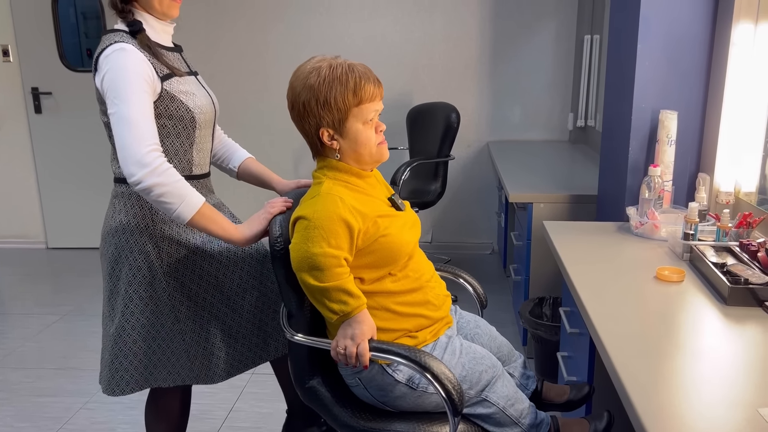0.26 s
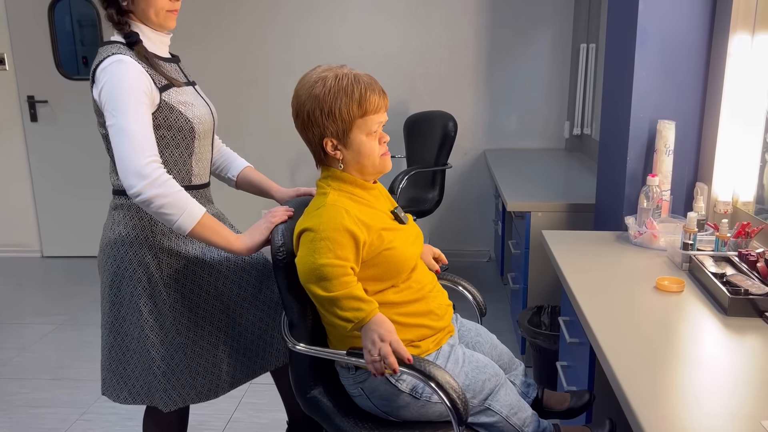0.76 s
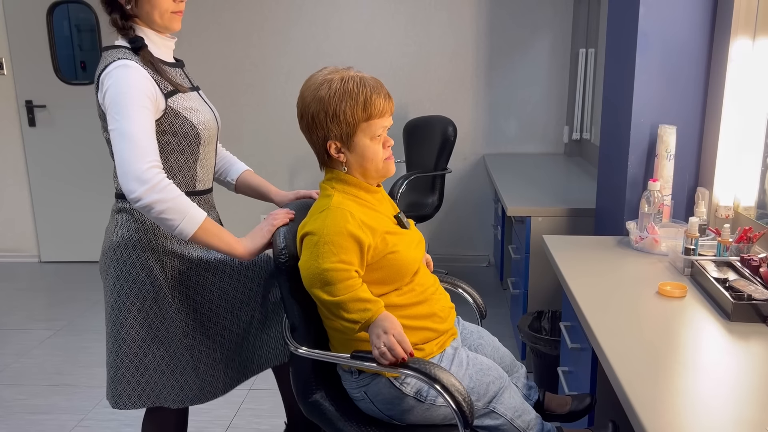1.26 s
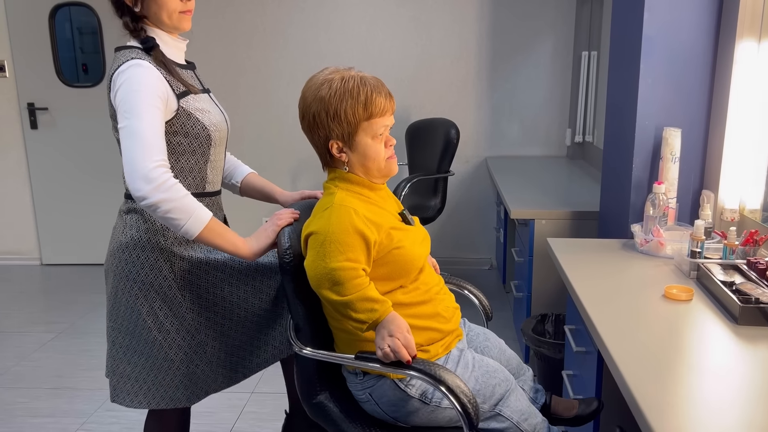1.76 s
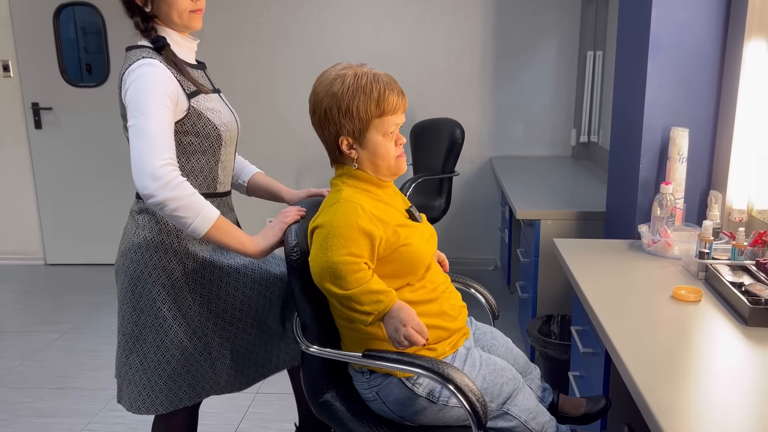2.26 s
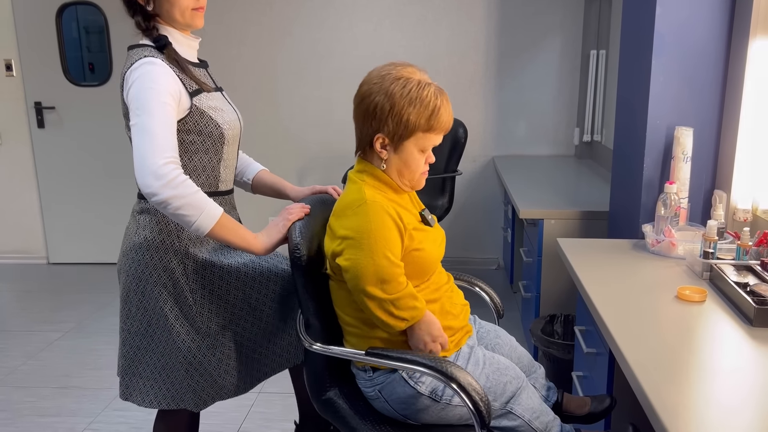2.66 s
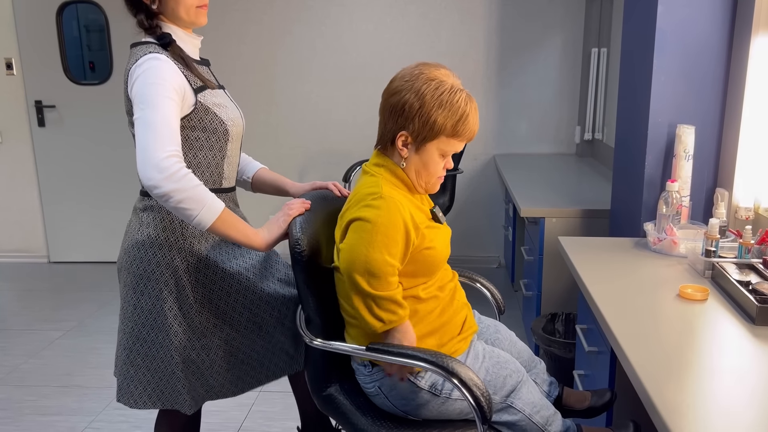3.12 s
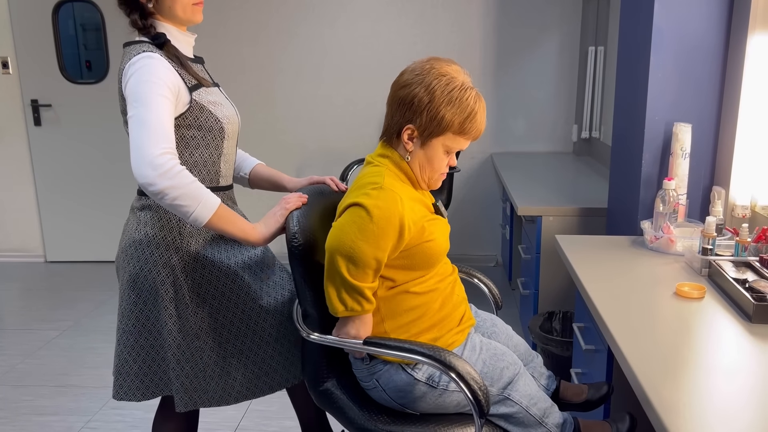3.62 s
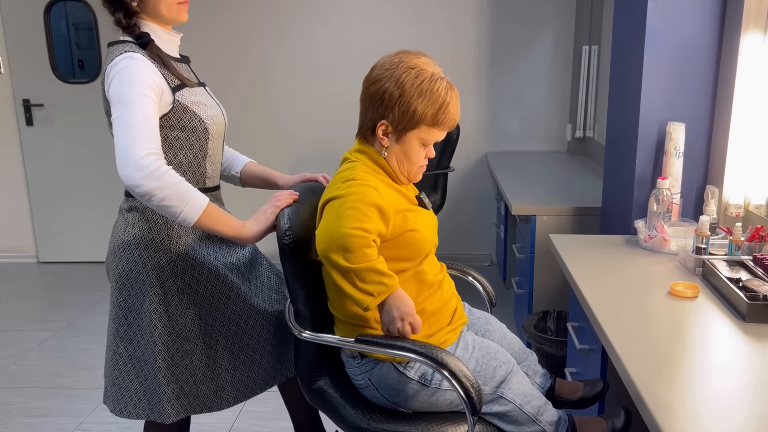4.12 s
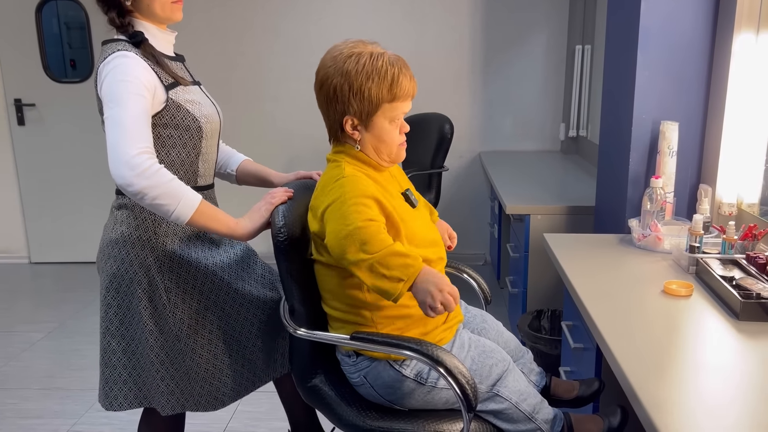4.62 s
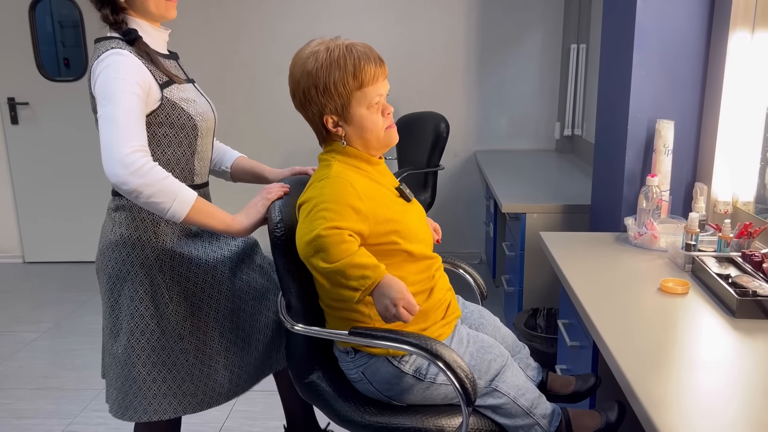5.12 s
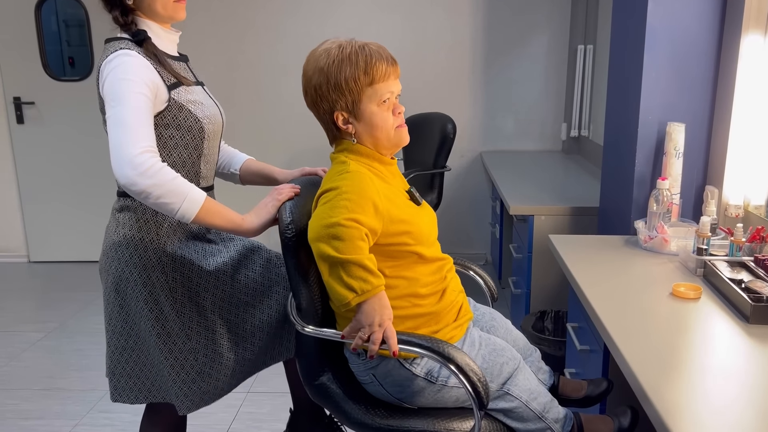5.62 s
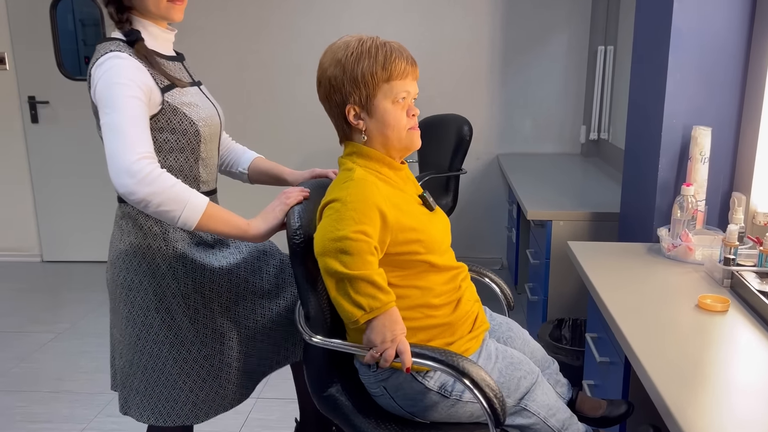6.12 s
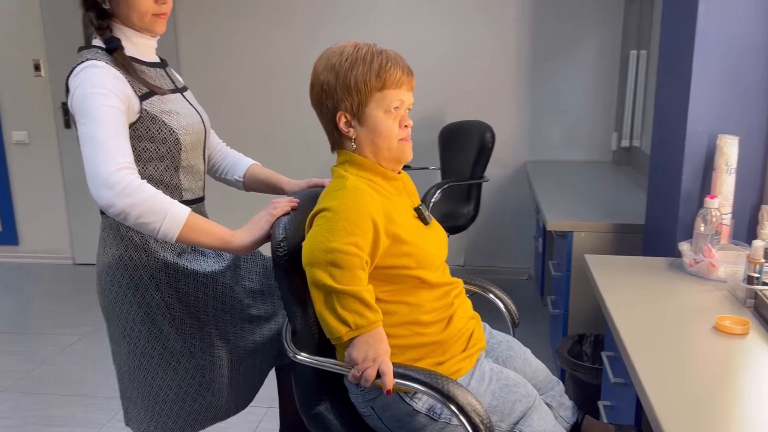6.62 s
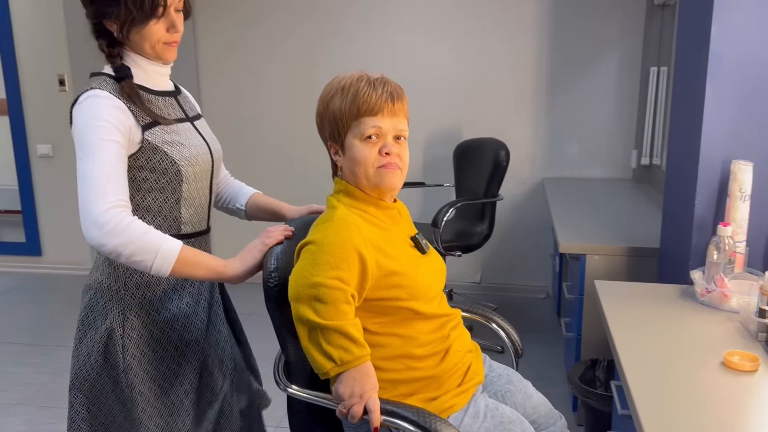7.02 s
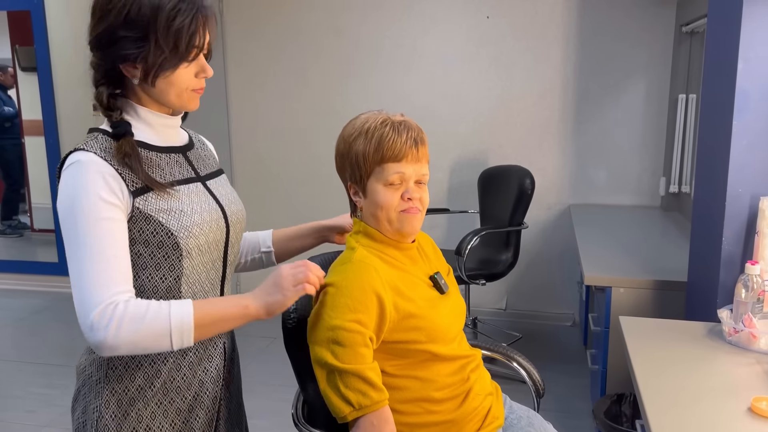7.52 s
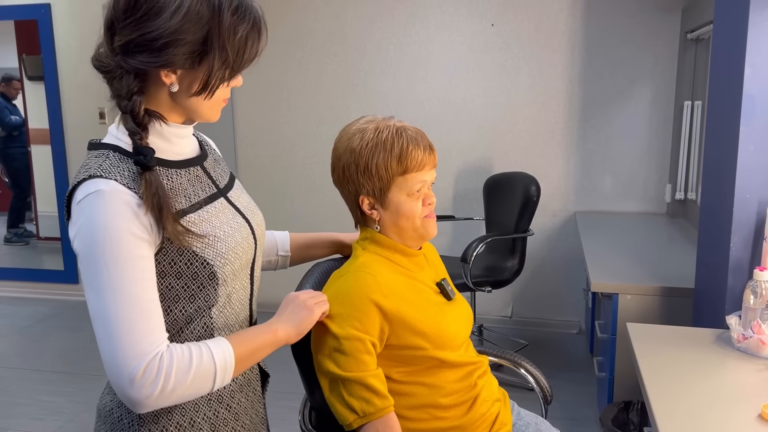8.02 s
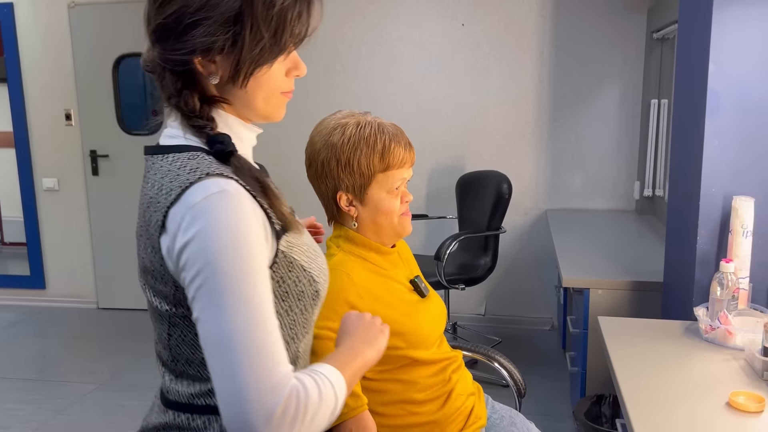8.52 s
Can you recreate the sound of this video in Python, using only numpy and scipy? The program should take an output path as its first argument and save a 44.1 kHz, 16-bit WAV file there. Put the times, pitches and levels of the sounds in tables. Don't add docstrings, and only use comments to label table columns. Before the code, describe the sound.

Steady clunking of a chair's pump pedal with creaks and cloth rustle in a quiet hard room, ending in rattling, a shoe scuff and steps.

```python
import sys
import numpy as np
from scipy import signal
from scipy.fft import rfft, irfft, next_fast_len
from scipy.io import wavfile
from scipy.ndimage import uniform_filter1d

SR = 44100
rng = np.random.default_rng(int(sys.argv[2]) if len(sys.argv) > 2 else 0)


def boost(x):
    u = np.asarray(x, float) / 20
    return 10 ** u


def master_out(mix):
    frames = np.transpose(np.atleast_2d(mix))
    ceiling = np.clip(frames, -1, 1)
    pcm = np.round(ceiling * 32767).astype(np.int16)
    wavfile.write(sys.argv[1], SR, pcm)


N = 386757
SPAN = next_fast_len(SR * 3 // 8)

# t/s, knock peak/dB, thump/dB, clank/dB, clank pitch f/Hz
DOWN = [(0.102, -31.5, -13, 4.5, 1074), (0.558, -37, -15.5, 6, 936), (1.019, -36.5, -16, 4.5, 950),
        (1.461, -31, -7, 1.5, 1060), (1.88, -28, -11, 2, 1140), (2.289, -31, -13, 2, 1050),
        (2.713, -29.5, -11.5, 2, 1083), (3.128, -28.5, -12, 0, 1116), (3.547, -31, -13.5, 2.5, 1106),
        (3.964, -29, -15.5, 1, 1080), (4.419, -31.5, -21, -2.5, 1115), (4.885, -36, -21.5, -2, 1110),
        (5.362, -29.5, -13.5, -3, 1060), (5.783, -30.5, -12.5, -6, 1085), (6.259, -26.5, -12, -7, 980)]
# t/s, knock peak/dB, thump/dB, clank/dB, clank pitch f/Hz
BACK = [(0.315, -46.5, -5, -20, 1010), (0.789, -39, -9, -11, 1150), (0.926, -45.5, -13, -7.5, 880),
        (1.234, -35.5, -12, -12, 1160), (2.055, -36, -13, -8, 1060), (2.255, -42, -21, -2.5, 930),
        (2.476, -35.5, -13.5, -6.5, 1120), (2.908, -36, -9, -5.5, 1160), (3.319, -37.5, -10, -10.5, 950),
        (3.735, -36.5, -10.5, -5, 1290), (4.168, -40.5, -12.5, -20, 1290), (4.201, -46.5, -19, -5.5, 1090),
        (4.542, -49, -5, -4, 1020), (4.645, -36.5, -10.5, -9, 1170), (5.109, -34.5, -10.5, -5.5, 1080),
        (5.541, -34.5, -12.5, -7.5, 1110), (6.004, -39.5, -10, -11, 1240), (6.463, -42, -7, -9, 1010),
        (4.673, -42.5, -14, -11, 1100)]


def unit(x):
    return x / np.sqrt(np.mean(x ** 2) + 1e-20)


def peak(x):
    return x / np.max(np.abs(x))


def along(points, hz):
    f, v = np.transpose(points)
    return np.interp(np.log(hz + 1), np.log(f + 1), v)


def curves(rows):
    s, *cols = np.transpose(rows)
    return [np.interp(np.arange(N) / SR, s, c, -120, -120) for c in cols]


def coloured(x, spectrum):
    m = next_fast_len(len(x))
    gain = boost(along(spectrum, np.fft.rfftfreq(m, 1 / SR)))
    return irfft(rfft(x, m) * gain, m)[:len(x)]


def resonant(x, peaks):
    f = np.fft.rfftfreq(len(x), 1 / SR)
    gain = 0
    for k, (c, w, db) in enumerate(peaks):
        sign = (-1) ** k
        gain = gain + sign * boost(db) * 1j * f * w / (c * c - f * f + 1j * f * w)
    return irfft(rfft(x) * gain, len(x))


def rush(spectrum, patchy_db, grain_db):
    z = signal.stft(rng.standard_normal(N + 512), nperseg=512)[2]
    field = uniform_filter1d(rng.standard_normal(z.shape), size=6, axis=0)
    field = uniform_filter1d(field, size=10, axis=1)
    x = signal.istft(z * boost(patchy_db * unit(field)), nperseg=512)[1][:N]
    grains = unit(uniform_filter1d(rng.standard_normal(N), size=90))
    return unit(coloured(x * boost(grain_db * grains), spectrum))


def swells(s, db, rise, fall):
    t, out = np.arange(0, N, 32) / SR, 0
    for s, db, rise, fall in np.broadcast(s, db, rise, fall):
        out = out + boost(db - 30 * np.where(t < s, (s - t) / rise, (t - s) / fall))
    return np.interp(np.arange(N) / SR, t, out)


def shapes(modes, attack):
    t, (hz, db, t60) = np.arange(SPAN) / SR, np.transpose(modes)[:, :, None]
    return boost(db - 60 * t / t60) * np.sin(2 * np.pi * hz * t) * (1 - np.exp(-t / attack))


def ringing(rows):
    return peak(boost(rng.normal(0, 0.94, len(rows))) @ rows)


def add(track, s, sound):
    track[round(s * SR):][:len(sound)] += sound


def walls():
    # f/Hz, t60/s
    fading = [(80, 1), (250, 0.27), (600, 0.38), (1500, 0.48), (4000, 0.37), (10000, 0.21)]
    hz, t, z = signal.stft(rng.standard_normal(SPAN), SR, nperseg=256)
    tail = signal.istft(z * boost(-60 * t / along(fading, hz)[:, None]), SR, nperseg=256)[1]
    return np.pad(tail / np.linalg.norm(tail), (round(0.0054 * SR), 0))


def room(x, wet_db, known=0, share=0):
    tail = np.sqrt(share) * known + np.sqrt(1 - share) * walls()
    return x + boost(wet_db) * signal.fftconvolve(x, tail[:len(x)])[:len(x)]


def pushes(column, contact):
    # delay t/s, level on lever/dB, level on casing/dB
    bounces = np.array([
        (0, 0, -16.5),
        (.0025, 0, -6.5),
        (.0048, -0.5, 2.5),
        (.011, -5.5, -9),
        (.02, -10, -9.5),
    ])
    count = len(bounces)
    delay = bounces[:, :1] * (1 + .07 * rng.standard_normal((count, 1))) + 3 * contact
    size = boost(bounces[:, [column]] + 1.3 * rng.standard_normal((count, 1)))
    head = np.arange(SPAN // 10) / SR
    push = np.sum(size * np.exp(-.5 * ((head - delay) / contact) ** 2), 0)
    return np.pad(push, (0, SPAN - len(head)))


def pedal(rows, lever, contact, settle, rattle_db, plate_db, ring_db, wet_db, lever_db, pins_db):
    # share of the clank pitch, width/Hz, level/dB
    clank_peaks = [(1.05, 230, 11.5), (0.78, 207, 9.5), (1.24, 300, 2)]
    # f/Hz, level/dB, t60/s
    thump_modes = [(42, -20.5, 0.85), (69.6, -2.5, 0.24), (112.8, 5, 0.24), (178.2, 0.5, 0.25),
                   (228.4, -6, 0.43), (322, -21, 0.42)]
    # f/Hz, level/dB, t60/s
    steel_modes = [(980, -10, 0.3), (950, -1, 0.39), (1010, -16.5, 0.9), (1060, -0.5, 0.16),
                   (1152, -6, 0.2), (1298, 10, 0.089), (1353, -12.5, 0.88), (1612, -6, 0.2),
                   (1900, -30, 0.11), (2100, -8.5, 0.15)]
    # f/Hz, level/dB, t60/s
    lever_modes = [(415, 1, .085), (378, -12.5, .25), (439.3, -9, .2), (496, -9.5, 0.15), (613, -10, .12),
                   (747, -10, .12), (311, -16, .2)]
    # f/Hz, width/Hz, level/dB
    plate_peaks = [(1780, 140, -9.5), (1785, 330, 0), (2000, 145, -1.5), (2660, 224, -9)]
    # f/Hz, level/dB
    rattle_colour = [(1290, -25), (2200, -6), (2330, -3), (2660, -6.5), (3510, -11), (4280, -6.5),
                     (5800, -14), (6560, -13), (9270, -18), (9900, -11.5), (11000, -14.5), (14600, -11.5),
                     (15700, -4)]
    # f/Hz, width/Hz, level/dB
    pin_peaks = [(2670, 310, -1), (3200, 200, -2), (4210, 300, -5), (4820, 120, -4), (5470, 130, -4.5),
                 (6110, 120, -9), (6510, 170, -8), (7040, 120, -9)]
    out, t = np.zeros(N + SPAN), np.arange(SPAN) / SR
    base, steel = shapes(thump_modes, attack=settle), shapes(steel_modes, attack=0.0068)
    bar = shapes(lever_modes, attack=.003)
    known = walls()
    late = np.clip(t - .005, 0, None)
    shake = boost(-60 * late / 0.081) * (1 - np.exp(-late / 0.003))
    for s, db, thump_db, clank_db, hz in rows:
        knock = -peak(resonant(pushes(column=1, contact=contact), lever))

        piston = pushes(column=2, contact=.22 * contact)
        casing = resonant(piston, [(share * hz, w, level) for share, w, level in clank_peaks])
        clank = peak(resonant(casing, [(hz, 900, 0)]))
        plate = peak(resonant(resonant(piston, plate_peaks), [(2000, 4800, 0)]))
        plate = np.roll(plate, round(.004 * SR))
        clank = clank + boost(plate_db) * plate

        jolt = shake * rng.standard_normal(SPAN)
        detune = 1 + [.02, 0, 0] * rng.standard_normal((len(pin_peaks), 3))
        uneven_db = [0, 0, 2.2] * rng.standard_normal((len(pin_peaks), 3))
        pins = peak(resonant(jolt * shake, pin_peaks * detune + uneven_db))
        rattle = peak(coloured(jolt, rattle_colour)) + boost(pins_db) * pins

        rattle_gain = boost(rattle_db - 0.63 * s - db)
        bar_gain = boost(lever_db + .3 * s)
        dry = knock + boost(clank_db) * clank + rattle_gain * rattle
        ring = boost(thump_db + 7) * ringing(base)
        ring = ring + boost(clank_db + ring_db) * ringing(steel) + bar_gain * ringing(bar)
        add(out, s - .0025, boost(db + 2.0) * (room(dry, wet_db, known, share=.45) + ring))
    return out[:N]


def shoe():
    # t/s, level/dB, rise/s, fall/s (both for 30 dB), grit/dB
    scrapes = [(6.643, -44, 0.0088, .33, -21), (6.685, -50, .05, .14, -5), (6.742, -49, .015, 0.33, -1),
               (6.785, -50, .1, .07, -13), (6.838, -47, 0.014, 0.23, -0.5), (6.9, -48.5, .15, 0.08, -10),
               (7.345, -56, .015, .3, -25), (7.394, -48, 0.1, 0.07, -24), (7.935, -49, 0.083, 0.11, -12.5),
               (7.97, -54.5, 0.11, .2, -25), (8.05, -62.5, 0.18, 1, -11)]
    # f/Hz, level/dB
    sole_colour = [(60, -42), (150, -12), (280, -8), (420, 0), (700, -0.5), (1000, -3.5), (1350, -8),
                   (1700, -15), (2500, -25), (4000, -50)]
    # f/Hz, level/dB
    grit_colour = [(1180, -34), (2000, -0.5), (2760, -1.5), (3830, -13), (5040, -11), (5800, -15),
                   (7110, -16), (9650, -34), (13000, -37)]
    sole = rush(sole_colour, patchy_db=0.5, grain_db=-0.5)
    grit = rush(grit_colour, patchy_db=2.5, grain_db=0.0)
    s, db, rise, fall, grit_db = np.transpose(scrapes)
    rub = swells(s, db, rise, fall) * sole
    rub = rub + swells(s, db + grit_db, rise, fall / 1.83) * grit
    return room(boost(-.6) * rub, wet_db=-4.5)


def steps():
    # t/s, peak/dB, boom/dB, slap/dB
    landings = [(7.336, -32.5, -13, -10), (7.384, -36, -22, -3), (7.459, -40, -12, -16),
                (7.922, -41, -20, -8), (7.942, -32.5, -15.5, -16), (7.955, -33.5, -27, -14),
                (7.973, -35.5, -26, -16), (8.105, -44, -24, -14), (8.547, -33.5, -8, -1.5),
                (8.557, -29, -5, -9), (8.573, -33, -8, -12), (8.598, -36, -15, -8), (8.639, -43, -22, -11)]
    # f/Hz, width/Hz, level/dB
    tiles = [(174, 69, -2), (315, 80, 0.5), (422, 99, -7.5), (577, 140, -1)]
    # f/Hz, width/Hz, level/dB
    boom_peaks = [(61, 25, -7), (91, 40, 4.5), (116, 24, 1)]
    # f/Hz, width/Hz, level/dB
    slap_peaks = [(800, 280, 0), (1230, 310, -3.5), (1690, 630, -9.5)]
    out = np.zeros(N + SPAN)
    for s, db, boom_db, slap_db in landings:
        knock = peak(resonant(pushes(column=1, contact=0.00039), tiles))
        boom = peak(resonant(pushes(column=1, contact=0.0016), boom_peaks))
        slap = peak(resonant(pushes(column=1, contact=.0001), slap_peaks))
        step = knock + boost(boom_db) * boom + boost(slap_db) * slap
        add(out, s - .002, boost(db - 1.5) * room(step, wet_db=-2.5))
    return out[:N]


def ticks():
    # t/s, peak/dB, pitch f/Hz, t60/s, width/Hz
    pings = [(.218, -55, 3400, .05, 1200), (0.365, -50.5, 3300, .05, 800), (1.63, -45, 2360, 0.11, 2000),
             (3.79, -41, 3800, .012, 4500), (3.791, -47, 5640, 0.043, 900), (3.8, -58, 2300, 0.11, 800),
             (3.8, -49, 8100, .012, 2000), (4.94, -55, 2540, .15, 300), (6.27, -46, 1680, .2, 150),
             (5.262, -53, 1500, .04, 600), (5.28, -57, 2200, .05, 500), (5.115, -53.5, 2580, 0.089, 700),
             (5.135, -58, 4300, .03, 1500), (1.234, -57, 2780, .04, 1500), (8.546, -54, 2900, .05, 1500),
             (3.133, -51, 7000, .06, 2500), (3.553, -47, 10000, .06, 4000), (3.97, -51, 10000, .05, 1500),
             (6.652, -48, 3160, 0.033, 1500), (6.681, -57, 5000, .03, 6000), (6.736, -52, 7260, 0.13, 500),
             (6.832, -42, 4970, .03, 1400), (6.831, -41, 2730, 0.062, 600), (7.12, -62, 2350, 0.3, 1194),
             (7.184, -52, 700, .02, 400), (7.187, -58, 2500, .02, 1500), (7.135, -54, 850, .08, 200),
             (2.914, -54, 3800, .05, 900), (1.355, -57, 3000, .03, 2000), (6.752, -40, 1250, .12, 150),
             (6.795, -42, 1280, .08, 200), (6.784, -42, 620, .04, 200), (1.64, -52, 4800, .05, 600),
             (8.239, -67, 1640, 0.19, 150), (8.399, -60, 3250, 0.14, 1490), (8.41, -62, 2280, 0.17, 600)]
    # t/s, peak/dB, pitch f/Hz, t60/s, airy top/dB
    snaps = [(8.673, -54, 2900, .08, -30), (.107, -44.5, 4600, 0.12, -25), (1.558, -44, 2540, 0.053, -5),
             (1.629, -48, 7500, 0.15, -9), (2.506, -54, 4000, .03, -1), (2.598, -55, 4000, 0.025, -2),
             (2.655, -58, 3000, .03, 1), (2.852, -44, 3470, 0.073, -5), (2.996, -54, 2600, .02, -12),
             (3.36, -58, 7000, 0.11, -3), (4.673, -54, 5240, 0.033, 2), (6.738, -48, 4000, .04, -18),
             (8.674, -57, 4440, .08, -12)]
    out, t = np.zeros(N + SPAN), np.arange(SPAN // 3) / SR
    rows = [(*row, -32) for row in pings]
    rows += [(*row[:4], 3300, row[4]) for row in snaps]
    for s, db, hz, t60, width, top_db in rows:
        burst = boost(-60 * t / np.clip(t60, .003, .3)) * rng.standard_normal(len(t))
        body = peak(resonant(resonant(burst, [(hz, width, 0)]), [(hz, 3 * width, 0)]))
        top = peak(resonant(resonant(burst, [(13000, 4400, 0)]), [(13000, 5000, 0)]))
        add(out, s, boost(db) * (body + boost(top_db) * top))
    return room(out[:N], wet_db=-1.0)


def close():
    # t/s, peak/dB, pitch f/Hz, t60/s, width/Hz
    near = [(6.507, -46.5, 5460, .008, 1600), (6.507, -58, 11000, .005, 3000),
            (3.788, -45, 3600, .007, 1600), (3.789, -44, 5700, .025, 500), (4.577, -48, 9000, .006, 9000),
            (4.587, -45, 7000, .008, 6000), (5.255, -49, 1500, .015, 1000), (5.257, -55, 8500, .0074, 2500)]
    # t/s, level/dB, rise/s, fall/s (both for 30 dB)
    peels = [
        (4.596, -58.5, .14, .006),
        (4.58, -60, 0.046, .05),
    ]
    # f/Hz, level/dB
    peel_colour = [(1200, -30), (2500, -4), (3500, -4), (5200, 0), (7000, -5), (12000, -9), (15800, -6)]
    out, t = np.zeros(N + SPAN), np.arange(SPAN // 8) / SR
    for s, db, hz, t60, width in near:
        burst = boost(-60 * t / np.clip(t60, .003, .1)) * rng.standard_normal(len(t))
        add(out, s, boost(db) * peak(resonant(resonant(burst, [(hz, width, 0)]), [(hz, 3 * width, 0)])))
    peeling = unit(coloured(rng.standard_normal(N), peel_colour))
    return out[:N] + swells(*np.transpose(peels)) * peeling


def stirring():
    # t/s, level/dB
    load = [(0, 2), (1.2, -1.5), (1.6, 2), (2.9, 0.5), (3.4, -1), (4.1, 0), (5.0, -1.5), (5.5, -0.2),
            (6.5, -3), (6.9, -32)]
    # t/s, rubbing/dB, rise and fall/s (for 30 dB), silky top/dB, weight on chair and floor/dB
    shifts = [(0.01, -65.5, .3, -14, 12.5), (4.5, -68, 0.1, -8, 4), (.39, -62, 0.96, -16, 2),
              (.78, -71, 0, -6, -6), (1.66, -57.5, 0.5, -10, -4), (2.1, -78, 0.6, -1, -12),
              (2.35, -61, 0.2, -20, -22), (2.56, -62, 0.2, -3, 2), (2.8, -54, 0.3, -13, -2),
              (3.25, -63.5, 1.2, -3, -11), (4.15, -63, 0.3, 1, -5), (4.55, -59, 0.1, -8, -5),
              (4.93, -57.5, 0.56, -22, -5), (5.59, -63.5, 1, -8, -6), (6.2, -67.5, 1, -4, 5),
              (6.81, -63, 0.5, -18, -3), (7.12, -70, .4, -10, 7), (7.25, -61, .5, -3, 5),
              (7.79, -66.5, 0.46, -9, 4), (7.97, -59.5, 0.38, -2, 9), (8.43, -68.5, 0.4, -2, 7),
              (8.75, -56, .5, -19, -4)]
    # f/Hz, level/dB
    creak_colour = [(80, -17), (200, 2), (400, -0.5), (800, -6.5), (1200, -11.5), (2300, -21),
                    (4000, -39.5)]
    rocking_colour = [(18, -22), (45, -3), (75, -9.5), (115, -3), (170, -8), (300, -47.5)]
    cloth_colour = [(1500, -6.5), (3000, 1), (6000, -5), (10000, -10.5), (13000, -15)]
    silk_colour = [(8000, -17), (11000, -8.5), (14500, -8), (16000, 3.5)]
    s, db, length, silk_db, weight_db = np.transpose(shifts)
    lift = swells(np.transpose(DOWN)[0] + 0.13, 0, rise=0.51, fall=.5)
    strain = boost(curves(load + [(9, -60)])[0]) * lift
    weight = swells(s, db + weight_db, length, length)
    hit_s, hit_db = np.transpose(DOWN + BACK)[:2]
    jolt = swells(hit_s + .02, hit_db - 20, rise=.06, fall=.16)

    creak_gain = boost(-54.5) * strain + boost(-1.9) * weight
    rocking_gain = boost(-63.5) * strain ** 1.1 + boost(-13) * weight + jolt
    cloth_gain = boost(-11.5) * swells(s, db, length, length) + boost(-91)
    silk_gain = boost(-0.5) * swells(s, db + silk_db, length, length) + boost(-81)
    creak = creak_gain * rush(creak_colour, patchy_db=2.1, grain_db=1.2)
    rocking = rocking_gain * rush(rocking_colour, patchy_db=1, grain_db=1.2)
    cloth = cloth_gain * rush(cloth_colour, patchy_db=2.3, grain_db=1.2)
    silk = silk_gain * rush(silk_colour, patchy_db=2.3, grain_db=1.2)
    return creak + rocking + cloth + silk


def ventilation():
    # f/Hz, level/dB
    air_colour = [(25, -22), (100, -10), (334, -6), (363, -7.5), (454, -14), (494, -5), (537, -13),
                  (1050, -13), (1510, -25), (1680, -20), (2290, -48), (2490, -31.5), (5000, -32.5),
                  (15700, -37.5)]
    return boost(-61) * rush(air_colour, patchy_db=0.0, grain_db=2)


def scene():
    # f/Hz, width/Hz, level/dB
    knock = [(221.4, 158, -3.5), (415, 65, -0.5), (500, 30, -12), (308.5, 139, -1), (627, 138, -1.5),
             (770, 110, 0.5)]
    # f/Hz, width/Hz, level/dB
    rebound = [(220, 90, 1), (320, 110, -1), (410, 70, -2), (545, 110, 1), (640, 110, -1), (790, 90, -6),
               (1440, 60, -9)]
    # t/s, knock peak/dB, thump/dB, clank/dB, clank pitch f/Hz
    clatter = [(6.641, -31, -22, 0.5, 880), (6.651, -36, -28, 0, 900), (6.671, -37, -28, -2, 1000),
               (6.681, -39, -28, -2, 800), (6.709, -43, -28, -4, 900), (6.735, -36, -28, 4.5, 1250),
               (6.751, -43, -28, 9, 1290), (6.782, -39, -28, 0, 800), (6.794, -42, -28, 6, 1280),
               (6.827, -31.5, -28, 1.5, 1340), (6.846, -41, -28, 5, 1150), (6.857, -42, -28, 6, 1100),
               (6.9, -43, -28, 4, 1250)]
    strokes = pedal(DOWN, knock, contact=0.00038, settle=.013, rattle_db=-41, plate_db=-11,
                    ring_db=-12, wet_db=0.8, lever_db=-11.5, pins_db=-9.5)
    returns = pedal(BACK, rebound, contact=0.00027, settle=.005, rattle_db=-58, plate_db=-11.5,
                    ring_db=-18, wet_db=0.3, lever_db=-23, pins_db=-18)
    freed = pedal(clatter, knock[1:], contact=0.00028, settle=.005, rattle_db=-58, plate_db=-12,
                  ring_db=-20, wet_db=-1, lever_db=-30, pins_db=-18)
    chair = strokes + returns + freed
    return (chair + shoe() + steps() + ticks() + close() + stirring() + ventilation())[None]


def band_limit(x):
    return signal.sosfilt(signal.butter(12, 15830, fs=SR, output="sos"), x)


def record(dry):
    band = [(10, -30), (30, -8), (60, 0), (15760, 0), (15860, -60)]  # f/Hz, level/dB
    mix = np.array([coloured(dry[0], band)])
    return band_limit(mix)


dry = scene()
out = record(dry)
master_out(out)
```